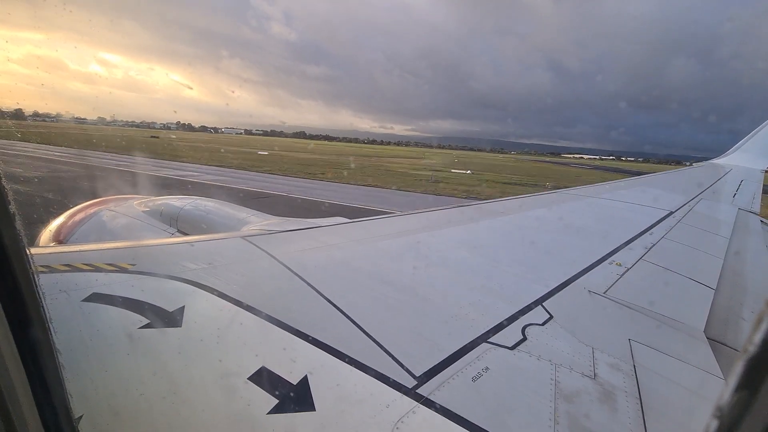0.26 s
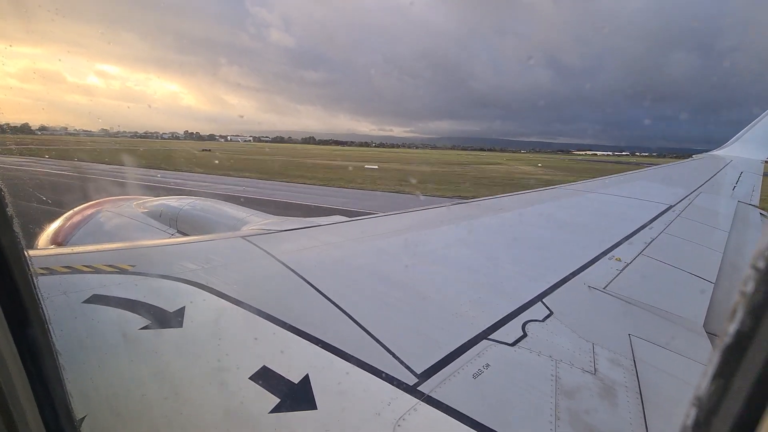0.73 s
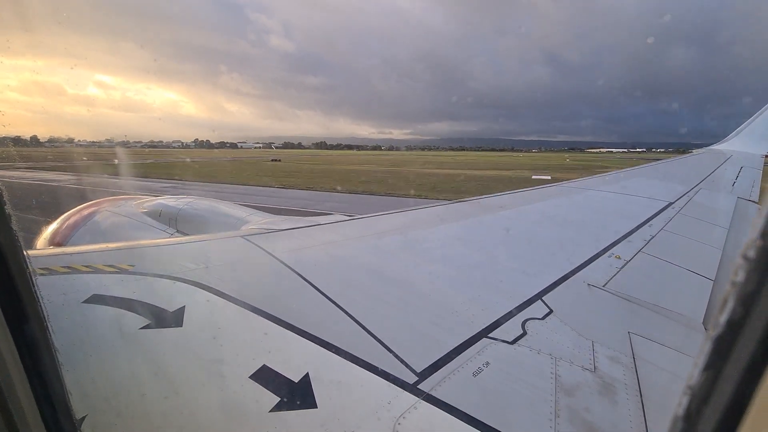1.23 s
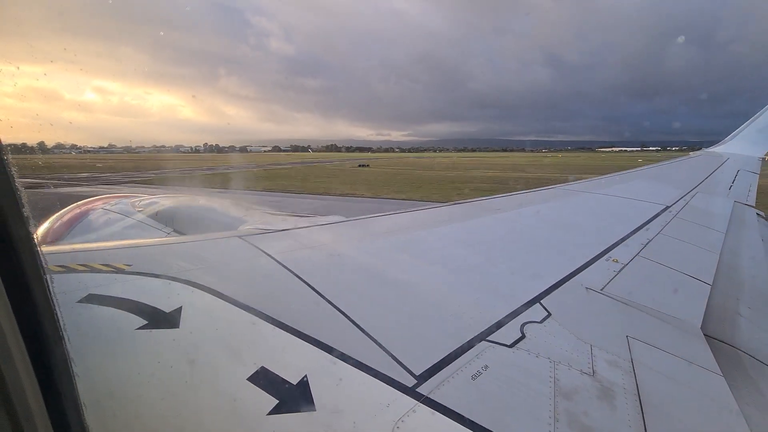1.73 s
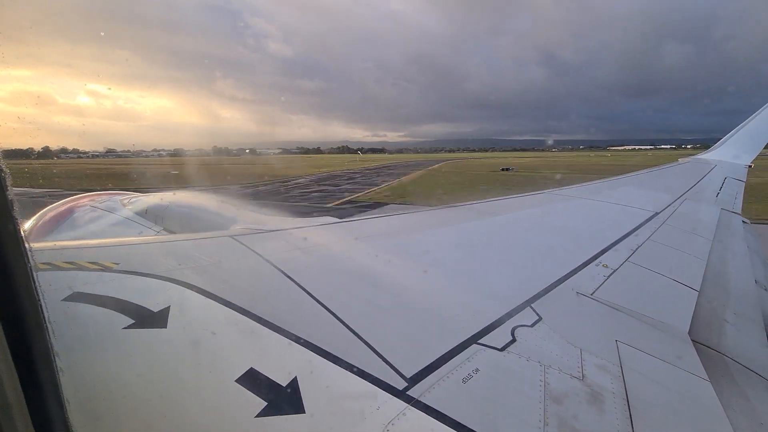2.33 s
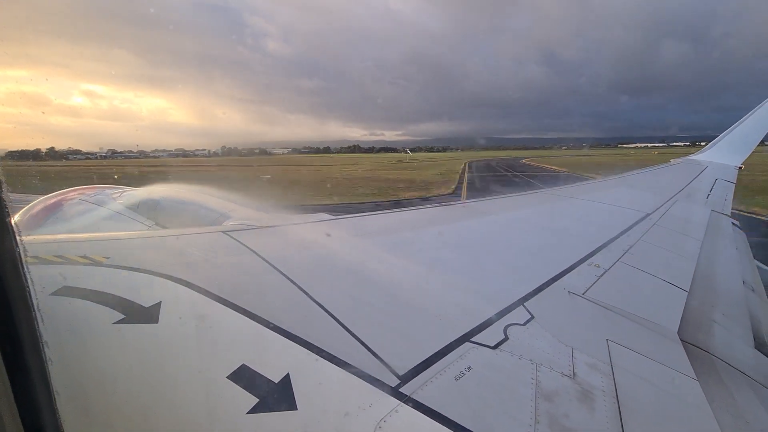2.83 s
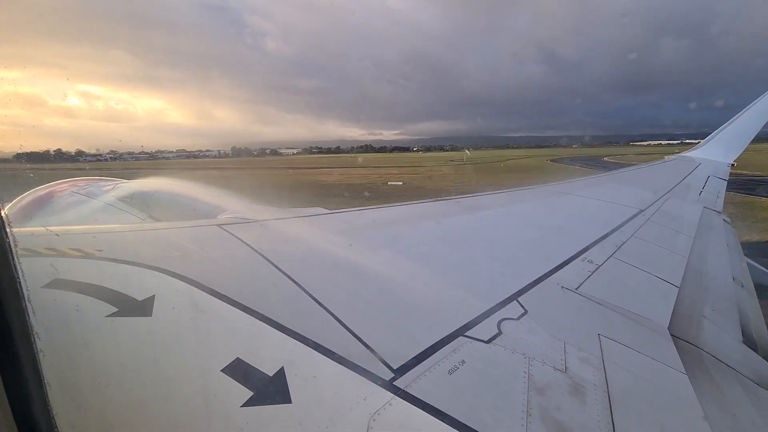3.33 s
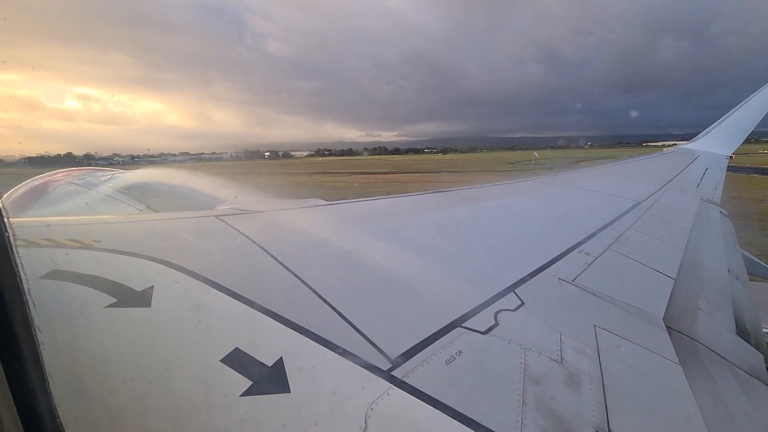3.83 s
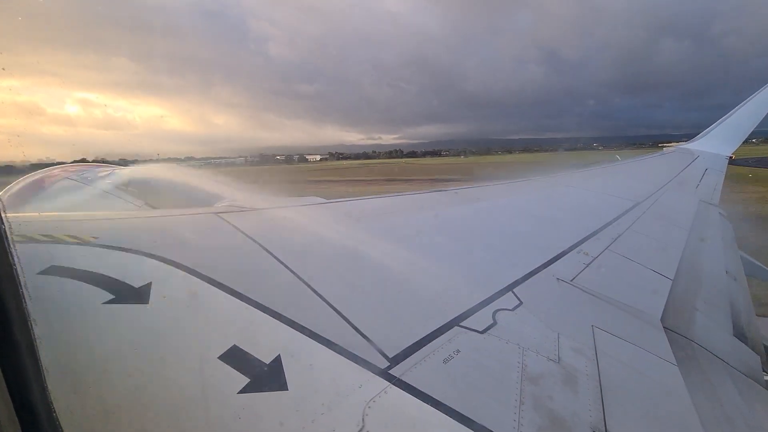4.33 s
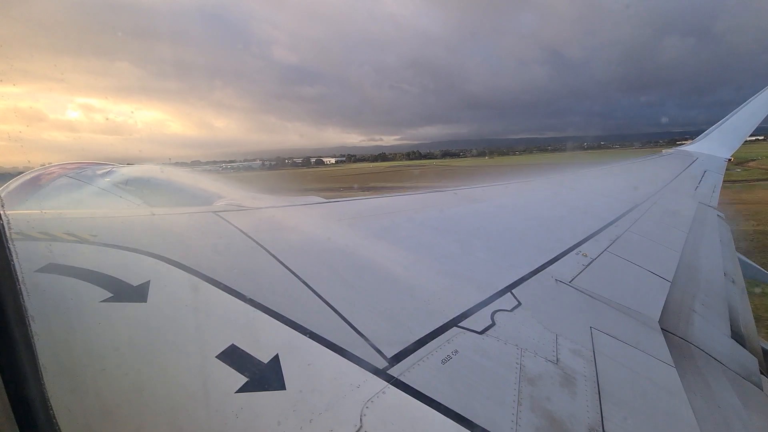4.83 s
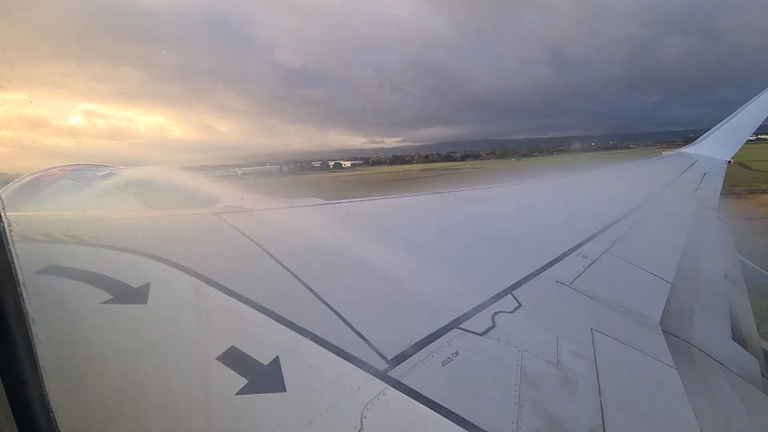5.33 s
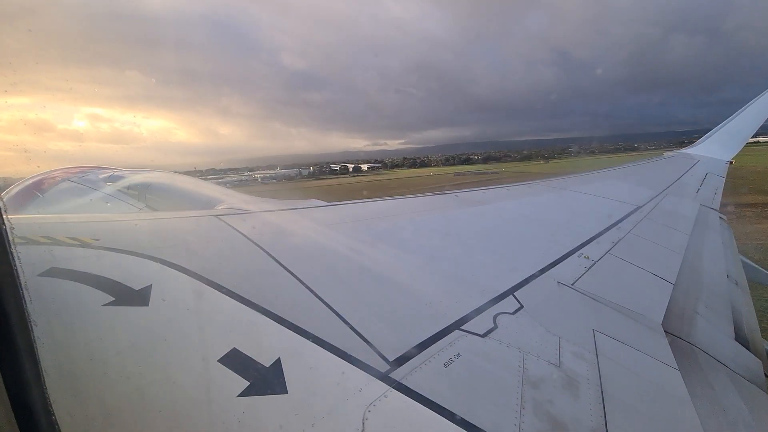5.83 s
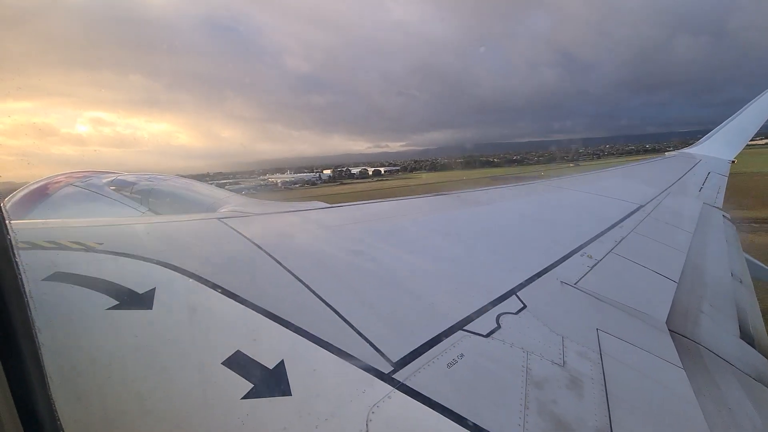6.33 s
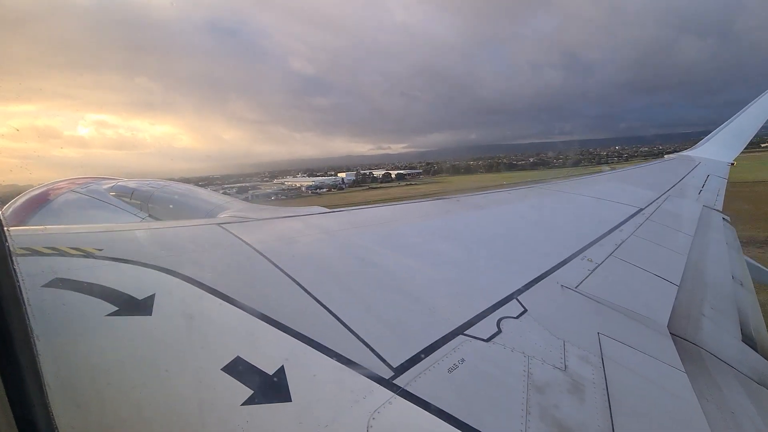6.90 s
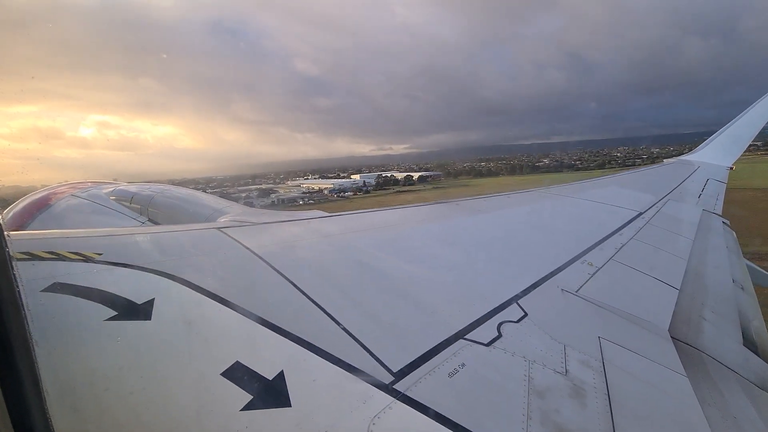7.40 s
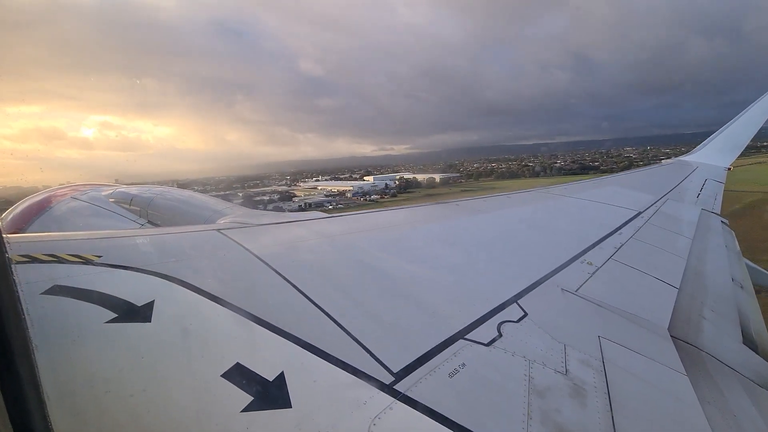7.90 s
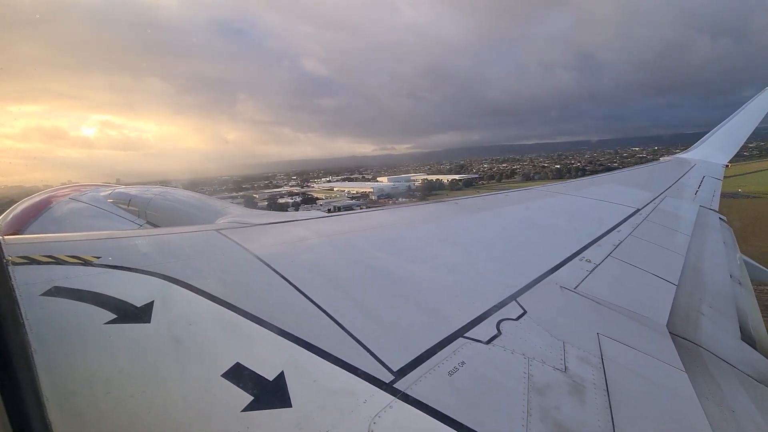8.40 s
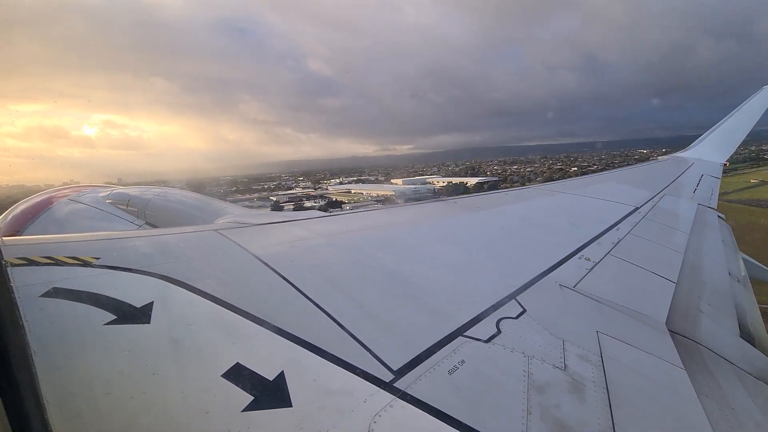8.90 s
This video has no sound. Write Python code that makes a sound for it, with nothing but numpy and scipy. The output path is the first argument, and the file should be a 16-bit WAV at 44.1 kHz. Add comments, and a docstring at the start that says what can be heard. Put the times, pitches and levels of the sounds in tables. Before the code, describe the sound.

Continuous muffled jet engine rumble inside an airliner cabin, deep and shuddering, slowly growing as the plane climbs. Air rushes softly over the skin and blowers hum. Early on come a clack and strong thud, a sharp tick, then brief hand rubs with a tiny squeak. Thin whines waver above the bass, and small trim rattles and a final clack follow. Handheld stereo pickup at the seat.

```python
"""A window seat over the wing of a jet airliner as it lifts off and climbs.
From the start: exhaust rumble through the hull, air roar, rush and hiss (all shaped noise), core whine,
cabin blower hum, engine and cabin drones (wavering tones). Trim knocks (ringing modes, noise bursts)
from 0.5 s. A casing tick at 0.5 s and 1.3 s; a hand's rubs from 1.5 s, squeaks at 1.8 s and 8.9 s.
A thin whistle peaks near 2.5 s and sinks away; the fan whine stands out from 2.4 s, swelling and fading."""
import sys
import numpy as np
from scipy import signal
from scipy.fft import rfft, irfft, next_fast_len
from scipy.io import wavfile
from scipy.ndimage import uniform_filter1d

SR = 44100
rng = np.random.default_rng(int(sys.argv[2]) if len(sys.argv) > 2 else 0)


def store_pcm(level_fs):
    """Save levels as 16-bit WAV."""
    pcm = np.round(np.clip(level_fs, -1, 1) * 32767).astype(np.int16)
    wavfile.write(sys.argv[1], SR, np.atleast_2d(pcm).T)


N = 403515
T = np.arange(N) / SR

# Colours only shape a spectrum: diffuse() sets the total to rms 1.
# Gains of hull and air layers. Each: start level in dB, slope in dB per s, waver spread in dB, waver rate in Hz.
# Exhaust rumble, growing through the climb.
RUMBLE_GAIN = (-17, 0.26, 0.3, 0.5)
# Boom of the cabin walls, growing with the rumble.
BOOM_GAIN = (-19.5, 0.1241, 0.32, 3)
# Deep shudder of the airframe, easing steadily; its zero rate gives a very slow trend.
SHUDDER_GAIN = (-19, -0.2, 0.65, 0)
# Air along the skin, louder as speed builds.
ROAR_GAIN = (-33, 0.15, 0.3, 5)
# Fine cabin hiss, slowly sinking.
HISS_GAIN = (-51.4, -0.38, 1.05, 19)

# Brief swells and dips of rumble and boom together. Each row: peak in seconds, 1/e half-width in seconds, dB.
HULL_SURGES = [(3.7, .09, 1), (4.7, 0.18, 0.5), (6.6, 0.058, -2), (8.66, 0.036, 1)]
# Further surges of the shudder. Each row: peak in seconds, 1/e half-width in seconds, dB.
SHUDDER_SURGES = [(.9, .3, 1), (3.2, .4, -3), (4.35, .25, 1.5), (5.35, .3, 2.5), (8.5, .4, -1.2)]
# Further surges of the wall boom. Each row: peak in seconds, 1/e half-width in seconds, dB.
BOOM_SURGES = [(1.9, .4, -1.3), (3, .3, 1), (4.35, 0.42, 1.5), (6.3, .4, .6)]
# Swells and dips of the air roar. Each row: peak in seconds, 1/e half-width in seconds, dB.
ROAR_SWELLS = [(.9, 1, 1.4), (1.9, 0.14, -2.5), (3.5, 0.89, 0.1), (5.1, .4, -1.2), (6.6, 0.35, 1),
               (8.95, 0.5, 2)]

# Spectrum of the shudder. Each row: frequency in Hz, relative density in dB per Hz.
SHUDDER_COLOUR = [(18, -20), (24, -18), (31, -26), (40, -4.5), (52, -3.5), (60, 3), (68, -9)]
# Spectrum of the rumble. Each row: frequency in Hz, relative density in dB per Hz.
RUMBLE_COLOUR = [(55, -34), (68, -6), (76, -1), (90, -1.5), (102, -1.5), (115, -0.5), (127, -7),
                 (145, -15.5)]
# Spectrum of the wall boom. Each row: frequency in Hz, relative density in dB per Hz.
BOOM_COLOUR = [(105, -18.5), (128, -4.5), (142, 1), (175, -5), (195, -4), (212, -6), (235, -7.5),
               (290, -14), (450, -36)]
# Narrow boom in the rumble, in waves. Each row: time in seconds, pitch in Hz, level in dB.
THROB_CURVE = [(0, 104.1, -28), (.8, 102, -28), (1.5, 100, -17.5), (2.1, 100, -20), (2.55, 90, -26.5),
               (2.9, 81, -19.5), (3.7, 81, -14), (4.2, 95, -21), (4.4, 97.9, -26), (4.7, 99.8, -16.5),
               (5.3, 100.3, -21.5), (5.8, 100, -32), (6.15, 101.9, -13.5), (6.6, 100.3, -24),
               (7.05, 108, -20.5), (7.5, 110, -21), (8.1, 105.2, -19.5), (8.6, 113, -18.5),
               (9.15, 108, -22)]
THROB_SCATTER, THROB_FADE_HZ = .65, 11

# Low buffeting of the air. Each row: time in seconds, level in dB.
BUFFET_LEVEL = [(0, -30), (1.5, -29.5), (2.3, -30), (5.6, -30.5), (6.4, -28.5), (7.05, -25.5), (7.35, -30),
                (7.7, -28.5), (8.2, -30), (9.15, -31)]
# Rush of the cabin air. Each row: time in seconds, level in dB.
RUSH_LEVEL = [(0, -47), (1.4, -45.5), (1.9, -48.5), (2.3, -46.5), (5.0, -48.5), (6.6, -47.5), (9.15, -46)]
# Spectrum of the buffeting. Each row: frequency in Hz, relative density in dB per Hz.
BUFFET_COLOUR = [(180, -29.5), (290, -1), (355, 1.1), (395, -6), (470, -15.5), (600, -32.5)]
# Spectrum of the roar. Each row: frequency in Hz, relative density in dB per Hz.
ROAR_COLOUR = [(330, -20), (420, -6.5), (480, -5.5), (555, -9.5), (595, -9), (700, -14), (950, -19),
               (1250, -19.5), (1450, -18), (1600, -20), (1730, -20), (1810, -24.8), (1980, -25),
               (2200, -32.5), (3500, -47)]
# Spectrum of the rush. Each row: frequency in Hz, relative density in dB per Hz.
RUSH_COLOUR = [(1200, -19), (2100, -3.5), (2400, 0), (2750, 2.5), (3050, -0.5), (3700, -7), (4500, -12.5),
               (5500, -20), (7000, -26)]
# Spectrum of the hiss. Each row: frequency in Hz, relative density in dB per Hz.
HISS_COLOUR = [(3500, -5), (5000, 1), (5550, 0.5), (6200, 2.5), (7000, 0.5), (7500, -4.5), (8400, -3),
               (8900, -0.5), (10600, 1.5), (12300, -2), (13300, -2), (14200, -3.5), (16000, -3.5)]
# Eddies stir buffeting, roar and rush together.
EDDY_DB, EDDY_RATE_HZ = 0.31, 7.7

# Engine core. Each row: time in seconds, whine in Hz, whine level in dB, octave level in dB.
CORE_CURVE = [(0, 1757.5, -58, -67), (1.5, 1756, -60, -73), (2.9, 1756.5, -56.5, -69),
              (3.8, 1756.5, -59, -70), (4.3, 1757, -52.5, -70), (5.15, 1758, -53, -72),
              (5.7, 1758.5, -58, -66), (6.05, 1759, -52, -68), (6.45, 1759, -60, -72),
              (6.8, 1759.5, -53, -71), (7.1, 1759.5, -60, -67), (7.4, 1760, -50.5, -64),
              (7.9, 1761, -56.5, -65), (8.4, 1762, -54.5, -63.5), (9.15, 1762.5, -56.5, -64)]
# Whine of the fan's blade rate. Each row: time in seconds, level in dB.
FAN_LEVEL = [(0, -52), (.9, -54), (2.38, -54), (2.5, -47), (2.7, -48.5), (2.82, -53), (2.92, -45),
             (3.05, -53), (3.5, -49), (3.62, -51), (3.85, -45), (4.1, -49.5), (4.28, -43), (4.48, -50),
             (4.76, -41.5), (4.94, -52), (5.13, -44), (5.24, -49.5), (5.38, -41.5), (5.48, -51),
             (5.64, -41.5), (5.95, -48.5), (6.19, -42.5), (6.42, -48.5), (6.6, -41), (6.75, -49),
             (7, -51.5), (7.25, -42), (7.47, -45), (7.57, -52), (7.69, -41.5), (7.9, -51), (8.3, -45),
             (8.55, -43.5), (8.75, -51), (8.94, -46), (9.05, -53), (9.15, -50)]
FAN_MEAN_HZ, FAN_WAVER_DB, FAN_WAVER_RATE_HZ = 1490, .8, 9
# Thin whistle. Each row: time in seconds, pitch in Hz, level in dB.
WHISTLE_CURVE = [(0, 3515, -75), (1.2, 3510, -67), (1.8, 3507, -68.5), (2.1, 3505, -61.5), (2.5, 3499, -61),
                 (2.8, 3490, -65), (3.1, 3478, -76), (3.6, 3455, -90)]

# Blower harmonics. Each row: multiple, level in dB before HUM_START_DB, left minus right in dB,
# left's lead in radians.
BLOWER_LINES = [(1, -40.8, 1.9, .1), (2, -57.5, 1, 1.44), (4, -64.5, -2, 1.9), (6, -69, 2, 1.2)]
# Engine and cabin drones. Each row: mean frequency in Hz, level in dB before HUM_START_DB,
# left minus right in dB, left's lead in radians.
ENGINE_DRONES = [(74.26, -28.5, 0.5, 0), (146.8, -33, 0.5, -0.2), (224.4, -31.5, 0.5, -0.15),
                 (731, -54, -6.5, 0.45), (1473, -58, -3, .5)]
BLOWER_MEAN_HZ = 518.4
HUM_START_DB, HUM_DB_PER_S, HUM_WAVER_DB = -2.3, 0.42, 1.9

# Trim knocks. Each row: start in seconds, thud in dB, clack in dB, rattle in dB,
# 60 dB decay of clack and rattle in seconds, rise constant in seconds.
KNOCKS = [(.488, -29, -30, -35, 0.065, .001), (.655, -1, -27, -30, 0.059, 0.0035),
          (1.503, -9.5, -33, -35, .2, 0.0018), (1.758, -11, -29, -41, 0.13, .003),
          (3.874, -34, -25, -42, .06, .001), (6.1, -36, -36, -39, 0.073, .0013),
          (6.33, -36, -40, -41, 0.18, .002), (6.395, -36, -32, -41, .08, 0.00098),
          (6.785, -22, -35, -40, 0.21, .008), (6.811, -17, -34, -40, 0.058, .002),
          (6.835, -26, -37, -42, .06, .002), (7.022, -36, -41, -36, 0.054, .001),
          (7.675, -14, -21, -43, 0.066, .0015)]
# Modes of a panel's thud. Each row: frequency in Hz, relative level in dB, 60 dB decay in seconds.
PANEL_MODES = [(143, 1, 0.073), (195, 0.5, 0.062), (273, -2, 0.048), (352, -10, 0.067), (485, -16, 0.057),
               (593, -19.5, .07)]
# Spectrum of a panel edge's clack. Each row: frequency in Hz, relative density in dB per Hz.
CLACK_COLOUR = [(350, -4), (690, 11.5), (900, 1.5), (1150, 9.5), (1500, 4), (1800, 3), (2200, -11),
                (4000, -29)]
# Spectrum of the trim clips' rattle. Each row: frequency in Hz, relative density in dB per Hz.
RATTLE_COLOUR = [(1200, -18), (2000, 3.5), (2900, 1.5), (3400, -1), (4200, -12), (6500, -16), (8000, -20),
                 (15000, -30)]

# Ticks of the casing. Each row: start in seconds, level in dB, 60 dB decay in seconds.
TICKS = [(.489, -38.5, .035), (1.3159, -18.5, .011)]
# Spectrum of the ticks. Each row: frequency in Hz, relative density in dB per Hz.
TICK_COLOUR = [(3000, -25), (6000, -16), (6750, -4), (7600, -22), (9400, -13), (10700, 5), (12500, -9),
               (14500, -1), (16000, 2)]
# Slips of the grip. Each row: start in seconds, length in seconds, scrape level in dB, low bump level in dB.
RUBS = [(1.492, 0.039, -41.5, -15), (1.506, .068, -43, -14), (1.51, .11, -48, -20),
        (1.74, 0.14, -42.5, -21), (1.748, 0.072, -45.5, -19), (6.29, .14, -53.5, -45),
        (6.385, .06, -51, -45), (6.78, .07, -55, -45)]
# Spectrum of the scrape. Each row: frequency in Hz, relative density in dB per Hz.
RUB_COLOUR = [(1200, -12), (3000, -1), (5700, -1), (6350, 4), (7000, 0), (7700, -0.5), (10000, 1),
              (13000, 1.5), (16000, -8)]
# Spectrum of the bump. Each row: frequency in Hz, relative density in dB per Hz.
BUMP_COLOUR = [(18, -14), (35, 7), (55, 18), (110, -29), (300, -52)]
# Squeaks of the grip. Each row: start in seconds, length in seconds, pitch in Hz, level in dB.
SQUEAKS = [(1.765, .08, 6400, -46.5), (8.9, 0.092, 7650, -61)]
GRIP_LEAN_DB = 1.8
SLIP_DB, SLIP_RATE_HZ = 4.6, 320  # so fast that drift's points are nearly independent
SQUEAK_SLIPS_PER_S, SQUEAK_FADE_HZ = 100, 250

# Microphone pair's spread. Each row: frequency in Hz, difference over sum in dB.
WIDTH = [(25, -19), (52, -34), (76, -31.5), (110, -25.5), (143, -11.5), (163, -27), (205, -11.5),
         (245, -19.5), (300, -11.5), (420, -10.5), (490, -7), (700, -5.5), (880, -5.5), (1050, 3),
         (1400, 2), (1600, 5), (1800, 0.5), (2030, -2.5), (2400, 1), (15000, 0.5)]
# Microphone pair's phase. Each row: frequency in Hz, left's lead in radians.
LEAD = [(25, -0.21), (90, -0.022), (200, -0.16), (380, -0.48), (520, 0.3), (720, 0.31), (1000, 1),
        (1500, 0.33), (2400, 0.049)]
# Microphone pair's balance. Each row: frequency in Hz, left minus right in dB.
LEAN = [(60, 1.2), (160, 0.2), (400, -1.5), (750, 0.5), (1100, -1), (1500, -5), (2000, -3), (2300, 0),
        (2900, 2.5), (5000, 1.5), (7600, -2), (9100, 4), (11200, 2), (13300, -2)]
CUTOFF_HZ = 15800


def from_db(db):
    """Amplitude gain from dB."""
    return 10 ** (np.asarray(db) / 20)


def rms_one(x):
    """Scale to rms 1."""
    return x / np.sqrt(np.mean(x ** 2) + 1e-20)


def in_time(rows):
    """Each column of a curve, at every sample."""
    s, *columns = np.transpose(rows)
    return [np.interp(T, s, column) for column in columns]


def at_hz(points, hz):
    """A table read on a logarithmic frequency axis."""
    table_hz, values = np.transpose(points)
    return np.interp(np.log(hz + 1e-3), np.log(table_hz), values)


def panned(lean_db):
    """Left and right gains of constant total power."""
    gains = from_db(np.array([[.5], [-.5]]) * lean_db)
    return gains / np.sqrt(np.mean(gains ** 2, axis=0))


def drift(rate_hz):
    """Chance of rms 1: two-pole low-passed noise, one point per 100 samples, joined by lines."""
    pole = np.exp(-200 * np.pi * rate_hz / SR)
    white = rng.standard_normal(N // 100 + 1002)
    slow = signal.lfilter([1], [1, -2 * pole, pole * pole], white)[1000:]  # drop the run-in
    return np.interp(np.arange(N) / 100, np.arange(len(slow)), rms_one(slow))


def climb(start_db, db_per_s, waver_db, waver_rate_hz):
    """A gain that moves steadily as the aircraft climbs and wavers by chance."""
    return from_db(start_db + db_per_s * T + waver_db * drift(waver_rate_hz))


def arch(peak_s, width_s):
    """A smooth rise to 1 and fall back to 0."""
    return np.exp(-((T - peak_s) / width_s) ** 2)


def swelling(rows):
    """The gain of a table of smooth swells and dips."""
    return from_db(sum(db * arch(peak_s, width_s) for peak_s, width_s, db in rows))


def diffuse(colour):
    """Cabin-filling noise, rms 1: long waves reach both microphones nearly alike, short ones do not."""
    size = next_fast_len(N)
    hz = np.arange(size // 2 + 1) * SR / size
    mid, side = rfft(rng.standard_normal((2, size)))
    width = from_db(at_hz(WIDTH, hz))
    sides = np.array([[1], [-1]])
    pair = (mid + sides * width * side) / np.sqrt(1 + width ** 2)
    pair = pair * panned(at_hz(LEAN, hz)) * np.exp(.5j * sides * at_hz(LEAD, hz))
    # Beyond the table: 12 dB per octave below, 24 above.
    skirts = np.minimum(hz / colour[0][0], 1) ** 2 / np.maximum(hz / colour[-1][0], 1) ** 4
    return rms_one(irfft(pair * from_db(at_hz(colour, hz)) * skirts, size)[:, :N])


def steady(noise, size):
    """Noise whose power holds even over stretches of size samples."""
    power = np.mean(noise ** 2, axis=0)
    return noise / np.sqrt(uniform_filter1d(power, size=size))


def tone(hz, lean_db, scatter, fade_rate_hz, lead_rad=0):
    """A direct line plus shifting paths, so it fades on its own at each microphone; rms 1 before panning."""
    paths = np.array([drift(fade_rate_hz) + 1j * drift(fade_rate_hz) for side in range(2)])
    phase = 2 * np.pi * np.cumsum(hz * np.ones(N)) / SR + lead_rad * np.array([[.5], [-.5]])
    return panned(lean_db) * rms_one(np.real((1 + scatter * paths) * np.exp(1j * phase)))


def blow(start_s, t60_s, rise_s):
    """The envelope of a hit: a quick rise, then an exponential decay."""
    age_s = np.maximum(T - start_s, 0)
    decay = np.exp(-np.minimum(np.log(1000) * age_s / t60_s, 50))
    return (1 - np.exp(-age_s / rise_s)) * decay


def stroke(start_s, length_s):
    """The envelope of a rub: a smooth swell and fade."""
    return np.sin(np.pi * np.clip((T - start_s) / length_s, 0, 1)) ** 2


def hull():
    """Jet noise and buffeting shake the hull, which lets mostly the bass through."""
    shudder = climb(*SHUDDER_GAIN) * swelling(SHUDDER_SURGES) * steady(diffuse(SHUDDER_COLOUR), size=7000)
    rumble = climb(*RUMBLE_GAIN) * steady(diffuse(RUMBLE_COLOUR), size=3600)
    boom = climb(*BOOM_GAIN) * swelling(BOOM_SURGES) * steady(diffuse(BOOM_COLOUR), size=3600)
    return shudder + swelling(HULL_SURGES) * (rumble + boom)


def throb():
    """A narrow, lumpy boom in the rumble that wanders in pitch, alike at both microphones."""
    hz, level_db = in_time(THROB_CURVE)
    lumps = 1 + THROB_SCATTER * (drift(THROB_FADE_HZ) + 1j * drift(THROB_FADE_HZ))
    carrier = np.exp(2j * np.pi * np.cumsum(hz) / SR)
    return from_db(level_db) * rms_one(np.real(lumps * carrier))


def airflow():
    """The boundary layer buffets, roars and rushes; a fine hiss lies on top."""
    buffet_db, = in_time(BUFFET_LEVEL)
    rush_db, = in_time(RUSH_LEVEL)
    eddies_db = EDDY_DB * drift(EDDY_RATE_HZ)
    buffet = from_db(buffet_db + eddies_db) * steady(diffuse(BUFFET_COLOUR), size=9000)
    roar = climb(*ROAR_GAIN) * swelling(ROAR_SWELLS) * from_db(eddies_db) * diffuse(ROAR_COLOUR)
    rush = from_db(rush_db + eddies_db) * diffuse(RUSH_COLOUR)
    hiss = climb(*HISS_GAIN) * diffuse(HISS_COLOUR)
    return buffet + roar + rush + hiss


def core_whine():
    """The engine core's blade tone and its octave, scattered by turbulent air on the way in."""
    hz, level_db, octave_db = in_time(CORE_CURVE)
    whine = from_db(level_db) * tone(hz, lean_db=5, scatter=0.4, fade_rate_hz=9, lead_rad=.6)
    octave = from_db(octave_db) * tone(2 * hz, lean_db=2, scatter=0.98, fade_rate_hz=7.6)
    return whine + octave


def cabin_hum():
    """Blower harmonics, engine and cabin drones, slowly growing, each wavering in strength and pitch."""
    lines = [(k * BLOWER_MEAN_HZ, db, lean_db, lead_rad) for k, db, lean_db, lead_rad in BLOWER_LINES]
    hum = np.zeros((2, N))
    for hz, db, lean_db, lead_rad in lines + ENGINE_DRONES:
        gain = climb(db + HUM_START_DB, HUM_DB_PER_S, HUM_WAVER_DB, waver_rate_hz=3.8)
        wavering_hz = hz + 0.75 * drift(3.52)
        hum += gain * tone(wavering_hz, lean_db, scatter=0.19, fade_rate_hz=4.4, lead_rad=lead_rad)
    return hum


def trim():
    """Loose panels knock: the panel's low modes thud, its edge clacks and its clips rattle."""
    thud, clack, rattle = np.zeros((3, N))
    for start_s, thud_db, clack_db, rattle_db, t60_s, rise_s in KNOCKS:
        hit = blow(start_s, t60_s, rise_s)
        clack += from_db(clack_db) * hit
        rattle += from_db(rattle_db) * hit
        start = int(start_s * SR)
        age_s = T[:min(N - start, SR // 3)]
        ring = sum(from_db(db - 60 * age_s / mode_t60_s) * np.sin(2 * np.pi * hz * age_s)
                   for hz, db, mode_t60_s in PANEL_MODES)
        thud[start:start + len(age_s)] += from_db(thud_db) * (1 - np.exp(-age_s / rise_s)) * ring
    return thud + clack * diffuse(CLACK_COLOUR) + rattle * diffuse(RATTLE_COLOUR)


def casing_ticks():
    """The casing ticks: short decaying bursts of treble noise."""
    hits = sum(from_db(db) * blow(start_s, t60_s, rise_s=.0006) for start_s, db, t60_s in TICKS)
    return panned(GRIP_LEAN_DB) * hits * diffuse(TICK_COLOUR)


def grip_rubs():
    """Skin sticks and slips on the casing, roughening the scrape; each stroke nudges the casing."""
    scrape, bump = np.zeros((2, N))
    for start_s, length_s, level_db, bump_db in RUBS:
        scrape += from_db(level_db) * stroke(start_s, length_s)
        bump += from_db(bump_db) * stroke(start_s, length_s)
    slips = rms_one(from_db(SLIP_DB * drift(SLIP_RATE_HZ)))
    return panned(GRIP_LEAN_DB) * slips * scrape * diffuse(RUB_COLOUR) + bump * diffuse(BUMP_COLOUR)


def grip_squeaks():
    """Regular stick and slip chops a blurred high tone."""
    chatter = rms_one(1 + np.sin(2 * np.pi * SQUEAK_SLIPS_PER_S * T))
    squeaks = np.zeros((2, N))
    for start_s, length_s, hz, db in SQUEAKS:
        line = tone(hz, lean_db=1, scatter=2, fade_rate_hz=SQUEAK_FADE_HZ)
        squeaks += from_db(db) * stroke(start_s, length_s) * chatter * line
    return panned(GRIP_LEAN_DB) * squeaks


def whistle():
    """A thin, scattered tone that sinks in pitch and fades away."""
    hz, level_db = in_time(WHISTLE_CURVE)
    return from_db(level_db) * tone(hz, lean_db=4, scatter=.35, fade_rate_hz=10)


def fan_whine():
    """The fan's blade tone and its octave, scattered by turbulent air on the way in."""
    level_db = in_time(FAN_LEVEL)[0] + FAN_WAVER_DB * drift(FAN_WAVER_RATE_HZ)
    hz = FAN_MEAN_HZ + 0.91 * drift(3.65)
    whine = from_db(level_db) * tone(hz, lean_db=-3.0, scatter=0.22, fade_rate_hz=8.3, lead_rad=0.23)
    octave = from_db(level_db - 20) * tone(2 * hz, lean_db=4, scatter=0.49, fade_rate_hz=9, lead_rad=1.5)
    return whine + octave


def scene():
    """Everything heard at the seat."""
    cabin = hull() + throb() + airflow() + core_whine() + cabin_hum()
    handling = casing_ticks() + grip_rubs() + grip_squeaks()
    return cabin + trim() + handling + whistle() + fan_whine()


def record(dry):
    """The tallest peaks are rounded, the ends are eased over 4 ms, the top is cut."""
    rounded = dry / (1 + (dry / .92) ** 8) ** (1 / 8)
    to_end_s = np.minimum(T, T[-1] - T)
    eased = rounded * np.sin(np.pi / 2 * np.clip(to_end_s / .004, 0, 1)) ** 2
    low_pass = signal.ellip(12, .1, 90, CUTOFF_HZ, fs=SR, output="sos")
    return signal.sosfilt(low_pass, eased)


dry = scene()
out = record(dry)
store_pcm(out)
```